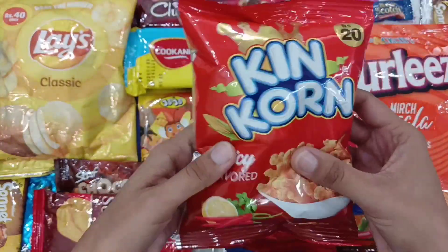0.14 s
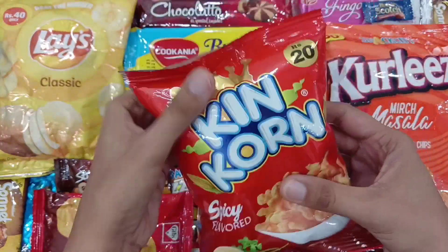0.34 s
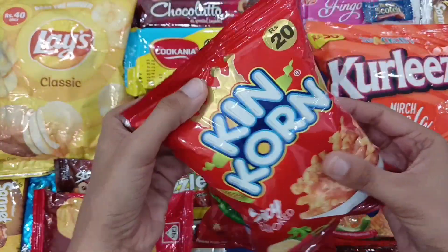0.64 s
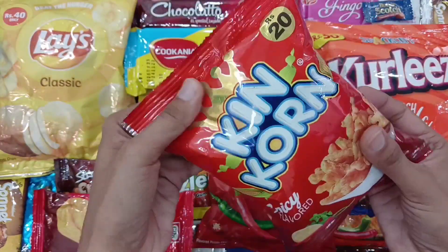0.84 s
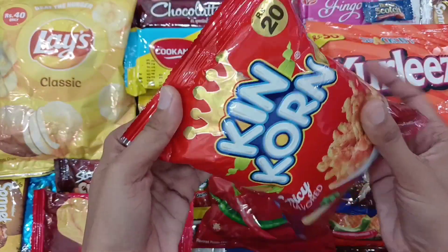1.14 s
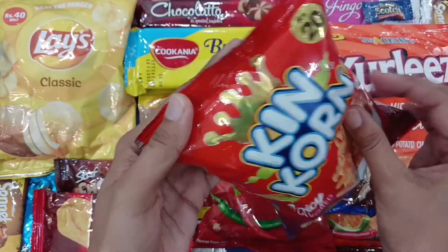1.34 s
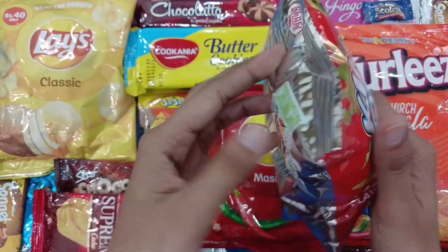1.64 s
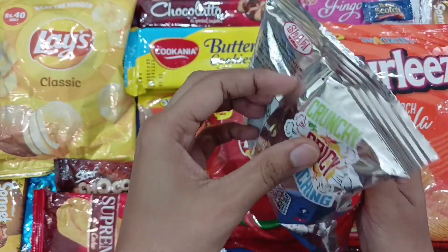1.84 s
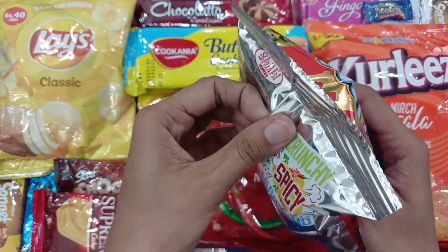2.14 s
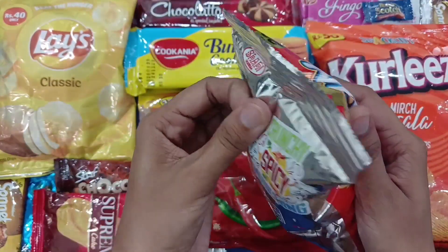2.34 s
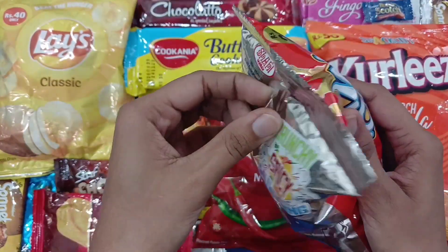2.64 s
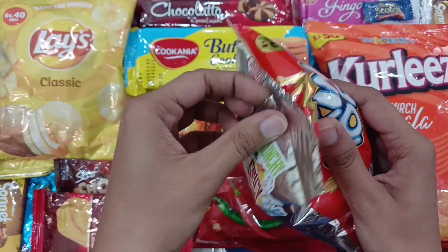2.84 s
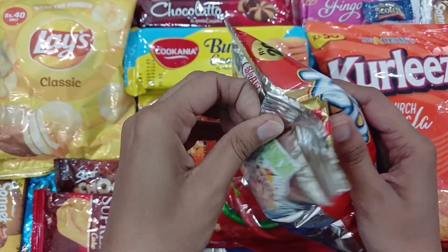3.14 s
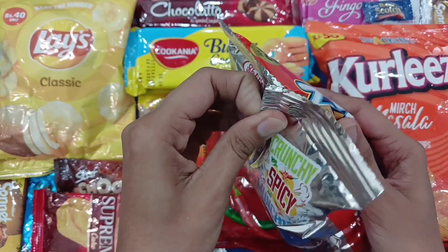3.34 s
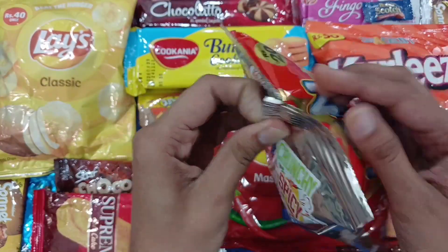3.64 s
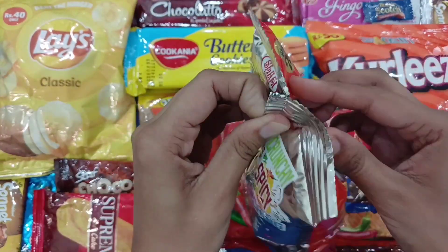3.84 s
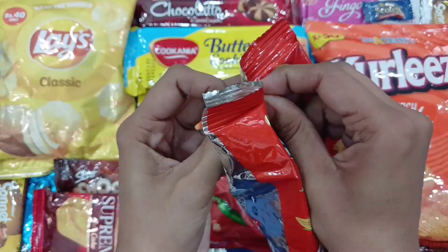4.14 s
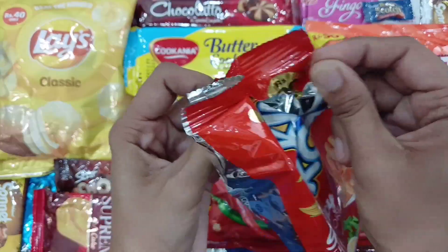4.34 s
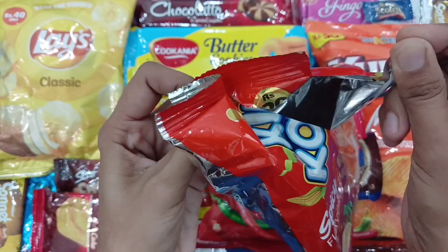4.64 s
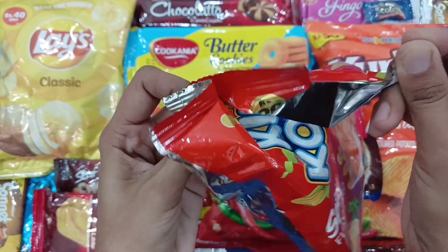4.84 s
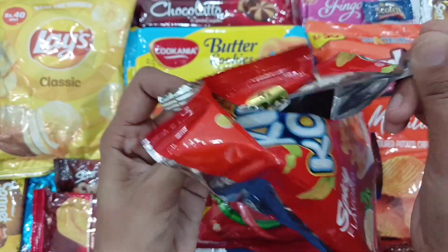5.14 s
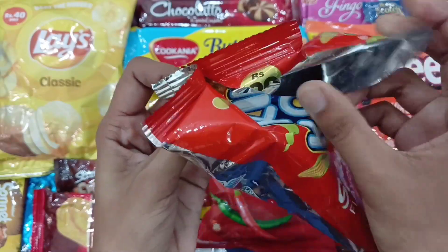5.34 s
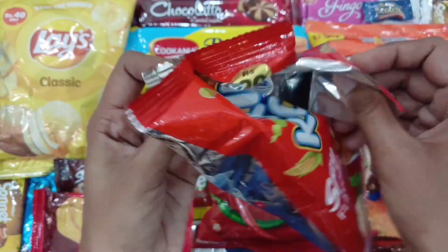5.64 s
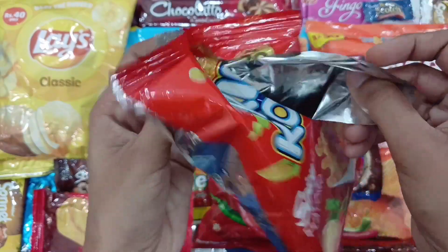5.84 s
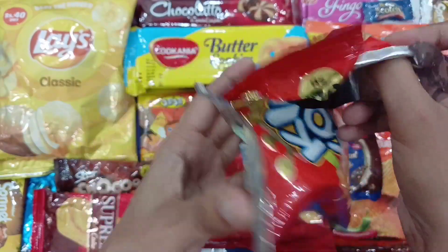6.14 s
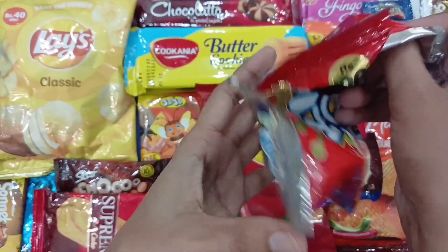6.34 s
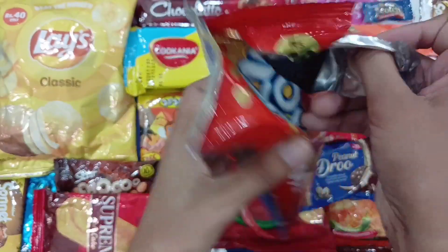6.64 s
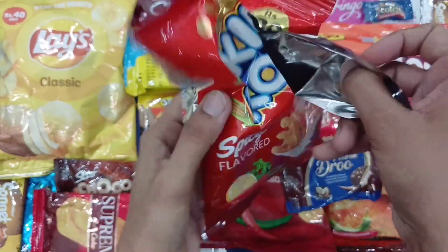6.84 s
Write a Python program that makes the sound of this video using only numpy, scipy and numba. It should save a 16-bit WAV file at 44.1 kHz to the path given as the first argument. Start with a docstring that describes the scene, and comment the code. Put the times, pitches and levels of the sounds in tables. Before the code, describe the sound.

Close, bright crinkling of a stiff plastic bag, with sharp snaps and dull airy thumps, a short pause, a tear, then looser, fainter rustling.

```python
"""A foil-lined snack packet, turned, squeezed and torn by hands close in front of a two-port phone.
Every crease that buckles rings for a few cycles; big snaps come as short avalanches of such rings
over a dense rustle of small ones, with lesser snaps between. The air-filled bag thumps below them.
The place is a quiet room: short echoes follow the packet and a faint room tone lies under it."""
import sys
import numpy as np
from scipy import signal
from scipy.fft import rfft, irfft, next_fast_len
from scipy.io import wavfile
from scipy.ndimage import uniform_filter1d
from numba import njit

SR = 44100
rng = np.random.default_rng(int(sys.argv[2]) if len(sys.argv) > 2 else 0)


def generate_wav(sig):
    """Save sig (samples, or channels by samples) to the path in sys.argv[1] as 16-bit PCM at SR."""
    pcm = np.round(np.clip(np.atleast_2d(sig).T, -1, 1) * 32767).astype(np.int16)
    wavfile.write(sys.argv[1], SR, pcm)


N = 307818  # length in samples

# Squeezes, turns and pulls of the hands. Each row: start of full strength in seconds, rise in seconds,
# hold in seconds, fall in seconds, rustle of the folds in dB rms before the microphone colour,
# foil against folds in dB, bag walls against folds in dB.
SQUEEZES = [(.0,0.06,.0,0.11,-38.5,-8,-5),(0.084,0.054,0.12,0.15,-38.5,-9,-6.5),(0.323,0.069,0.096,0.079,-50,-11,-14),(0.456,0.1,0.029,0.21,-34.5,-7.5,-6),
            (0.687,0.24,0.0056,0.14,-39,-3,-5.5),(0.796,0.031,0.13,0.073,-38.5,-14,-8),(0.894,0.12,0.062,0.12,-37.5,-3,-6),(1.093,0.06,.0,0.05,-47,-11,-32),
            (1.203,0.044,0.083,0.22,-40,-15,-11),(1.392,0.52,.0,0.075,-37.5,-1.5,-13.5),(1.439,0.0078,0.00047,0.018,-29.5,-9,-15),(1.488,0.21,0.1,0.16,-36.5,-8,-5),(1.742,0.089,0.03,0.2,-36.5,-8,-9),
            (1.861,0.087,.0,0.15,-37,-4,-4.5),(2.019,0.092,0.012,0.069,-37,-6.5,-20),(2.124,0.031,0.23,0.14,-37.5,-6.5,-11.5),(2.197,0.0096,0.014,0.017,-34.5,-6,-16),(2.464,.06,0.11,0.11,-47,-21,-7),(2.559,0.11,0.0076,0.21,-35.5,-5,-10),
            (2.69,.1,0.036,0.15,-57,-1,3),(2.795,0.046,0.014,0.12,-37,-8,-13),(2.9,0.13,0.0015,0.66,-42,-4.5,-23),(3.16,0.28,0,0.18,-42,-9,-12.5),
            (3.268,0.11,0.15,0.35,-37.5,-4,-11),(3.53,.1,0.076,0.18,-41.5,-7.5,-16.5),(3.687,0.047,0.0031,0.16,-34,-12,0),(3.792,0.048,.0,0.062,-27.5,-3.5,-16),
            (3.879,0.087,0.19,0.2,-40.5,-8,-7),(4.08,0.36,0.062,0.093,-44.5,-8.5,-13),(4.24,0.021,0.13,0.26,-43,1.5,-6),(4.44,0.11,0.037,0.16,-68,-17,10),
            (4.575,0.072,0.0071,0.11,-29.5,-4.5,-7),(4.693,0.11,0.015,0.19,-68,-9,-11),(4.793,0.09,0.17,.05,-59.5,-16,1.5),(4.954,0.015,0.1,0.054,-45.5,0,0),(5.11,0.044,0.078,.1,-54.5,-1,1.5),(5.216,0.083,0.056,0.07,-44,-6,-5),
            (5.399,0.034,0.016,0.069,-47,-12.5,-5.5),(5.531,0.028,0.06,0.16,-40,-3,-5),(5.664,0.079,0,.1,-48,-4.5,-11),(5.735,0.097,0.016,0.3,-41,-6.5,-5.5),
            (5.857,0.054,0.14,0.17,-43,-1.5,-6),(6.044,.05,0.068,0.12,-57,-8,1.5),(6.193,0.012,0.12,0.096,-48.5,-8,-6),(6.358,.1,0.029,0.13,-58.5,-3,-12),(6.577,0.11,0.035,.05,-75.5,-14,7),(6.659,0.0092,0.021,.1,-50.5,-16,-7),(6.693,0.015,0.13,0.26,-40,-9,-10),
            (6.96,0.12,0.034,.1,-31.5,-11,-9)]
SWING_DB = 20  # a rise or fall spans this much, times the pace below
# How fast each size of crease swells and dies against the folds. Each entry: a factor, whole bag to foil.
SWING_PACE = [.9, .95, 1.01, 1.05, 1.15]
WRINKLE_SHARE, WRINKLE_DB = 0.69, -0.5  # wrinkles lie between folds and foil: share of foil dB, offset dB
# Bass of the whole bag against its walls: low while gripped tight, most once torn.
# Each row: time in seconds, level in dB.
BOOM = [(0.0, -7), (0.9, -17.5), (1.55, -8), (2.1, -19), (3.2, -24), (3.75, -14), (4.3, -19), (4.55, 0),
        (4.85, 1.5), (5.3, -2.5), (6.1, -4.5), (6.6, 6), (6.98, -5.5)]

# Sizes of crease: whole bag, bag walls, folds, wrinkles, foil. Each row: lowest pitch in Hz,
# highest pitch in Hz, typical ring in cycles, rustle grains per second, size scatter in dB.
CREASE_SIZES = [(95, 230, 2.5, 400, 1.5), (200, 620, 2.0, 900, 2.5), (680, 2600, 1.9, 2400, 3.0),
                (2500, 6800, 2.6, 4200, 3.2), (6300, 16500, 3.2, 10000, 2.6)]
# The rustle dwells on this share of a size's pitch range, moves on this often per s, strays in octaves.
FOCUS_SHARE, FOCUS_RATE, STRAY_OCT = .8, 18, .15
# How strongly the quickest flurries shake the rustle. Each entry: strength in dB, whole bag to foil.
FLUTTER_DB = [2.3, 2.3, 2.8, 1.8, 1.24]

# Where the packet is held before the ports. Each row: time in seconds, left minus right in dB.
PAN = [(0.0, -1), (1.44, -0.5), (1.48, -4), (1.75, 0), (1.94, -5), (1.96, -1.0), (3.28, -0.5), (3.5, -3.5),
       (3.83, -1.5), (6.78, -1), (6.86, 1.0), (6.98, -4)]
# Port differences: mean lag and its scatter in s, balance scatter in dB.
PORT_LAG_S, PORT_SCATTER_S, PAN_SCATTER_DB = 5e-5, 6e-5, 3.5
# Further lag scatter in cycles of the ring; scatter of the ring length (natural log).
PORT_SCATTER_CYCLES, RING_SCATTER = 0.07, 0.37

# Faint room tone. Each row: frequency in Hz, relative density in dB per Hz.
AIR = [(18, -45), (30, -15), (189, 1), (384, -15), (540, -6), (1160, -19), (1910, -19), (2410, -23),
       (16000, -33)]
AIR_DB = -73  # rms over both ports, before the dips and the top cut

# Big snaps. Each row: time in seconds, then level in dB before trims and pitch in Hz
# for each part in turn: folds, bag walls, wrinkles, foil.
SNAPS = [(0.0643, -38, 2100.0, -47.5, 520.0, -30, 2990, -33, 10500.0),
         (0.0753, -35, 1880.0, -56.5, 430.0, -29, 3940, -25, 9780.0),
         (0.1012, -26.5, 706, -27.5, 510.0, -26, 3220, -27, 12000.0),
         (0.1199, -29, 1060.0, -25, 423, -35, 3310.0, -50, 10300.0),
         (0.1338, -22, 1630, -40, 390.0, -20.5, 3560, -20.5, 13000.0),
         (0.1693, -34, 965, -37, 400.0, -40, 4100.0, -38.0, 12400.0),
         (0.2082, -19.5, 1310, -29, 450.0, -24, 2960, -27, 11300.0),
         (0.216, -24, 990, -32, 377, -31, 4020.0, -33, 9910.0),
         (0.2725, -34.5, 949.0, -37, 530, -43, 3570.0, -50.0, 10100.0),
         (0.3135, -41, 1320.0, -45, 530.0, -35, 5190.0, -35, 11400.0),
         (0.3535, -32.5, 1720.0, -35, 510.0, -42, 4080, -41, 7820.0),
         (0.3942, -36, 1770.0, -38, 510.0, -35.0, 3220.0, -38, 8790.0),
         (0.4158, -26, 1330, -37, 425, -35, 3900.0, -45, 7330.0),
         (0.4241, -31, 1490.0, -37.5, 450.0, -34, 2700.0, -45, 8270.0),
         (0.4355, -23, 1060.0, -38, 270.0, -20, 5800, -20.5, 7600.0),
         (0.4563, -19.5, 1230, -21, 380, -26.0, 3840.0, -28, 14300.0),
         (0.4796, -22.5, 935, -43, 330.0, -27, 2840.0, -36, 10600.0),
         (0.4928, -45, 1140, -32, 290.0, -22, 6090.0, -14.5, 10400),
         (0.5239, -25.5, 880, -25.5, 392, -32, 4390.0, -46.0, 10100.0),
         (0.5519, -18, 840, -30, 398, -22, 3450, -21.5, 8960.0),
         (0.592, -38, 1360.0, -55.0, 370.0, -26, 5200, -28, 7240.0),
         (0.6405, -32, 1660.0, -59, 510.0, -31, 4830.0, -24, 11100.0),
         (0.6626, -22, 1250, -43, 352, -27, 3750.0, -28, 7460.0),
         (0.6723, -18.5, 1100, -27, 368, -14.5, 4970, -15.5, 9700),
         (0.7932, -22.5, 1100, -34, 308, -27, 3450.0, -28.5, 9950),
         (0.8052, -27, 1000, -41, 420.0, -34.5, 3250.0, -51, 8160.0),
         (0.8142, -39, 1285, -40.5, 240.0, -39, 4980.0, -15, 12600.0),
         (0.8281, -25, 1366, -33, 420.0, -21, 4800, -30.0, 10300.0),
         (0.8383, -24, 1410.0, -37, 440.0, -28, 3620, -29, 9540.0),
         (0.8482, -25, 890, -35, 440.0, -20, 4900.0, -15.5, 10500.0),
         (0.8719, -26.5, 1640.0, -33, 450.0, -15, 3640, -11.5, 10300),
         (0.882, -18.5, 980, -34, 450.0, -27, 3560, -32.5, 9440.0),
         (0.8887, -13.5, 1050, -26, 510.0, -18, 3700, -11, 10200),
         (0.9143, -17.5, 790, -20, 352, -22, 4010.0, -30, 11100.0),
         (0.9428, -40, 1240.0, -27, 345, -42, 4370.0, -37.5, 9870.0),
         (0.9587, -24.5, 923, -25.5, 442, -20, 3470, -19.5, 11600.0),
         (0.9676, -28, 1600.0, -41, 480.0, -24, 3680, -17.5, 11200.0),
         (1.0037, -29.5, 1510.0, -47, 320.0, -33, 2860, -28.5, 11000.0),
         (1.0849, -32.5, 888.0, -53, 500.0, -53, 3190.0, -47.5, 10700.0),
         (1.0944, -32.5, 1590.0, -50, 460.0, -31.5, 3860.0, -37.0, 10100.0),
         (1.1114, -32, 1460.0, -49.5, 480.0, -45, 3500.0, -47, 7890.0),
         (1.1483, -43, 1230.0, -42, 460.0, -36, 3610.0, -34.0, 12200.0),
         (1.1622, -37, 1650.0, -60, 470.0, -34, 4900, -39, 7110.0),
         (1.2023, -24.5, 1610, -34.5, 477, -27.5, 3500.0, -24.5, 11700.0),
         (1.2152, -31, 2010.0, -38, 510.0, -24.5, 3470, -36, 10200.0),
         (1.2235, -19, 1790, -24, 490.0, -44, 3040.0, -27, 12300.0),
         (1.2693, -20.5, 1250.0, -33, 330.0, -26, 4550.0, -31.0, 8520.0),
         (1.2856, -24, 963, -35, 350.0, -25, 4870.0, -22.5, 9380.0),
         (1.2926, -26.5, 802.0, -38, 500.0, -29, 5050.0, -22, 12000.0),
         (1.3425, -25.5, 1210.0, -29, 510.0, -24, 4250, -30, 9840.0),
         (1.3575, -25, 1050.0, -32, 380.0, -23, 3260.0, -32.5, 10100.0),
         (1.3834, -26, 1320, -34, 520.0, -29, 4110.0, -26, 7290.0),
         (1.3997, -28, 1450, -28, 470.0, -33, 3700.0, -35, 10200.0),
         (1.4345, -11.5, 1030, -29.5, 310.0, -14.5, 3540, -13, 9340.0),
         (1.4591, -35, 1430.0, -41, 480.0, -23.5, 3920.0, -21.5, 9560.0),
         (1.5118, -33, 1150, -32, 496, -40, 3860.0, -38.0, 10100.0),
         (1.5213, -26, 1090.0, -28.5, 432, -17, 4550, -12, 13300.0),
         (1.5383, -28, 1800.0, -26, 376, -19, 4410.0, -22, 11100.0),
         (1.5694, -20.5, 1480, -25.5, 328, -21, 5300, -22, 11000.0),
         (1.5847, -23.0, 740, -25.5, 327, -21, 4220, -18.5, 10900.0),
         (1.6448, -22.5, 1250, -49, 370.0, -28, 4170, -30, 10000.0),
         (1.6954, -38, 677.0, -22.5, 510, -42, 4190.0, -53.5, 8500.0),
         (1.7088, -29, 1010.0, -38, 510.0, -33, 3470.0, -42, 8190.0),
         (1.7225, -19, 1370.0, -31, 410.0, -21, 3670.0, -22, 11200.0),
         (1.7357, -21.5, 905, -27, 400, -20, 4500, -13.5, 11400),
         (1.7761, -36, 1620.0, -41, 360.0, -18.5, 4790.0, -17, 12800.0),
         (1.798, -26, 1300, -31, 400.0, -19.5, 4830.0, -21, 11200.0),
         (1.8558, -30, 1240.0, -44, 350.0, -24.5, 4110.0, -23, 8730.0),
         (1.8701, -20.5, 965, -23.5, 476, -21.5, 3860.0, -36, 11300.0),
         (1.9135, -29.0, 743.0, -31.5, 500.0, -37.5, 3810.0, -37, 9520),
         (1.9280, -25, 1300, -37, 460.0, -17.5, 2700, -17.5, 10800.0),
         (1.9605, -37, 840, -35, 490.0, -33.0, 2890, -46.0, 10400.0),
         (1.9886, -33, 1500.0, -51, 460.0, -29, 3770.0, -23, 11400.0),
         (2.0065, -20.5, 1480.0, -29.5, 520, -24, 3600, -24, 12400.0),
         (2.0139, -30, 1182, -31, 460.0, -29.5, 3590.0, -38.5, 11200.0),
         (2.0275, -25, 1240, -25, 470.0, -24, 3740.0, -25.5, 8000.0),
         (2.0372, -25, 1000, -29, 467, -26.5, 2860, -35.5, 9850.0),
         (2.1178, -24.5, 1410.0, -26.5, 480, -24, 3580.0, -23, 12100.0),
         (2.1261, -25.5, 1770.0, -40.5, 440.0, -31, 3080.0, -33, 9180.0),
         (2.139, -24, 1200, -28, 490, -29, 4310.0, -27.5, 10700.0),
         (2.1800, -24.5, 2000, -38, 450.0, -31, 2760.0, -19.5, 13340),
         (2.2008, -33, 1800.0, -32, 510.0, -27, 4140, -26, 11200.0),
         (2.2115, -43, 1530.0, -42.5, 450.0, -22, 4030.0, -21, 11700.0),
         (2.2318, -12, 1050, -27, 319, -14, 3100, -16, 9100),
         (2.249, -23, 1110, -26.5, 443, -10.5, 2230, -18, 12300.0),
         (2.2568, -19, 1000, -18, 474, -32, 2720.0, -47.0, 13500.0),
         (2.2712, -32, 1090.0, -34.5, 460.0, -24, 4370, -11.5, 12850),
         (2.278, -21.5, 1240, -38, 430.0, -28, 5120.0, -18, 13300.0),
         (2.309, -42.5, 1080.0, -28.5, 382, -22.5, 3370.0, -30, 11400.0),
         (2.3315, -29.5, 780, -20.5, 513, -30, 3360.0, -38, 11900.0),
         (2.3383, -25, 870, -24, 515, -40.0, 3080.0, -48.0, 9930.0),
         (2.3473, -18.5, 740, -19, 526, -24.0, 5050, -32, 10200.0),
         (2.3641, -48.5, 1680.0, -40, 460.0, -35, 3510.0, -28.5, 11900.0),
         (2.3758, -27, 990, -37.5, 480.0, -37, 4040, -36, 11100.0),
         (2.4433, -35, 1410.0, -39, 520.0, -28, 2870, -33, 7840.0),
         (2.4644, -38, 1290.0, -44, 490.0, -40, 3160.0, -31, 11300.0),
         (2.4875, -30, 890, -44, 480, -34, 2500, -45, 9000),
         (2.5094, -23.5, 950.0, -44, 500.0, -23, 3060, -20, 12000.0),
         (2.525, -22, 1500, -29, 360.0, -29, 3400.0, -34.5, 12300.0),
         (2.548, -21.5, 856, -37, 490, -24, 4250, -20.5, 12500.0),
         (2.5545, -20.5, 860, -34, 476, -20, 3900, -28, 10000),
         (2.5775, -26, 1200, -42, 480.0, -14.5, 4130, -19, 13000.0),
         (2.5932, -28, 1230.0, -24, 510.0, -25, 4350.0, -22, 9550.0),
         (2.6076, -24, 1260.0, -30, 470.0, -24.0, 2980.0, -26, 8130.0),
         (2.622, -25, 1170, -40, 390.0, -21, 4640.0, -18, 11400.0),
         (2.6842, -44, 1100, -43, 430, -34, 2400, -40, 9000),
         (2.6988, -36, 1930.0, -45, 430.0, -29.5, 3560.0, -33.5, 9590.0),
         (2.715, -30, 820, -34.5, 456, -36, 2850.0, -44.5, 9470.0),
         (2.7227, -23.5, 770, -36, 510.0, -30, 3400.0, -44.0, 9700.0),
         (2.7432, -43, 936.0, -44, 400.0, -40.0, 3730.0, -39, 9120.0),
         (2.7972, -27, 1520.0, -34, 480.0, -32, 4700.0, -23, 13200),
         (2.8095, -26, 2170.0, -41, 300.0, -26, 3180.0, -27, 11800.0),
         (2.8716, -20.5, 1470, -37, 530.0, -21.5, 3830, -30, 7150),
         (2.8961, -20, 1400, -50, 540.0, -28, 4100.0, -17, 11700),
         (2.9065, -18, 1070, -34.5, 524, -18.5, 4540, -17.5, 10800.0),
         (2.9438, -28, 1160.0, -48, 430.0, -25, 4860.0, -18, 12000),
         (2.9872, -23, 1170, -43, 500.0, -36, 3310.0, -21.5, 10500.0),
         (2.9971, -20.5, 1380, -36, 490.0, -27, 2810, -21, 11200),
         (3.0363, -26.5, 815, -33.5, 480.0, -29, 3540, -27, 7170.0),
         (3.0802, -34, 2010, -60.0, 510.0, -34, 4750.0, -25, 11900),
         (3.1049, -30, 876, -41, 440.0, -27, 4020, -24.5, 8950.0),
         (3.15, -25, 1340.0, -46, 450.0, -42.5, 3750.0, -43.5, 9510.0),
         (3.1701, -29, 1120.0, -42, 380.0, -35.5, 3440.0, -48, 10000.0),
         (3.1876, -29, 1390, -42.5, 410.0, -28, 3820.0, -30, 8920.0),
         (3.1978, -26, 754, -34.5, 520, -22, 4370.0, -23, 12100.0),
         (3.2112, -26, 1070, -41.5, 350.0, -29, 3920, -37.5, 8320.0),
         (3.2305, -20.5, 1800, -41, 420.0, -17, 4070, -14, 11600),
         (3.2425, -21, 1450, -17, 480, -20, 4500, -18.5, 11300),
         (3.2663, -33, 1510.0, -31.5, 447, -27, 4690.0, -32, 10700.0),
         (3.2907, -21, 1830.0, -37, 530.0, -24, 4570.0, -29, 10800.0),
         (3.2978, -20, 890, -34.5, 540.0, -20.5, 4090.0, -19, 10700.0),
         (3.3079, -20, 1730.0, -36, 350.0, -17, 5640, -19, 10900.0),
         (3.3447, -21.5, 940, -37, 533, -18, 3400, -14.5, 13550),
         (3.4024, -29, 1570, -34.5, 370.0, -32, 4820, -23, 7250.0),
         (3.4405, -27.5, 1070, -33, 480.0, -33, 5380.0, -25.0, 9510.0),
         (3.4507, -25.5, 873, -27.5, 450.0, -29.5, 4150, -34, 8830.0),
         (3.4631, -31, 1600.0, -29, 388, -29, 3740, -30.5, 8640.0),
         (3.4866, -25.5, 1590.0, -31, 420.0, -42, 3370, -41, 11900.0),
         (3.5196, -16.5, 1066, -39, 350.0, -12.5, 2290, -22, 8700),
         (3.5388, -17.5, 950, -35.5, 330.0, -20.5, 3260, -37, 9310.0),
         (3.5477, -37, 1820.0, -35.5, 360.0, -24.5, 3700.0, -25.5, 8750.0),
         (3.5734, -20.5, 1145, -33, 403, -21.5, 2350.0, -23, 12900.0),
         (3.6071, -18.5, 1010, -36.5, 540.0, -26, 3340.0, -27.5, 8460.0),
         (3.6663, -25, 820, -26, 410.0, -30, 4970, -30, 7100.0),
         (3.6876, -50.0, 978.0, -37, 460.0, -41.5, 3710.0, -33, 10600.0),
         (3.7021, -16.5, 685, -23, 470, -21, 4760.0, -21.5, 8400.0),
         (3.7104, -19, 749.0, -24, 367, -24, 3230, -32, 11000.0),
         (3.7435, -14.5, 890, -22, 505, -19.5, 5030, -17.5, 13400.0),
         (3.7668, -31, 847, -24, 366, -34, 4730.0, -34.5, 12700.0),
         (3.7937, -13.5, 1020, -20, 383, -12.5, 2550, -13, 12800.0),
         (3.8281, -32.5, 1820, -36, 330.0, -32, 4200.0, -33, 10600.0),
         (3.8915, -28, 1956, -43, 333, -28.5, 3090.0, -23.5, 9290.0),
         (3.9246, -22, 925, -38.5, 480.0, -25.5, 2960, -27.5, 8850.0),
         (3.9397, -26.5, 915.0, -42, 330, -43, 2840, -52, 10600.0),
         (3.9892, -27, 1000.0, -55, 390.0, -25, 3510.0, -41, 8020.0),
         (4.0031, -27, 2200.0, -42, 440.0, -17, 4350.0, -19, 8500),
         (4.04, -26, 1190, -42, 470.0, -23.5, 2900, -18, 13800),
         (4.0501, -12.5, 1030, -26.5, 290.0, -15, 2430, -14.5, 7600),
         (4.0731, -18.5, 1840, -30, 305, -32.5, 2580.0, -40, 11000.0),
         (4.1680, -49, 1200, -51, 450, -56, 2800, -70, 7500),
         (4.1879, -45.0, 1700.0, -61.5, 430.0, -49, 4740.0, -38, 7740.0),
         (4.2062, -36.5, 1430.0, -56.0, 450.0, -34, 3810.0, -41.5, 10500.0),
         (4.2294, -41, 1840, -52.0, 470.0, -39, 5130.0, -22, 10100.0),
         (4.2441, -21, 1500, -21, 525, -20, 4000, -22, 11200.0),
         (4.253, -25.0, 1530.0, -28, 420.0, -19, 4840.0, -21, 10300.0),
         (4.2656, -28, 1220, -31, 493, -23, 4000, -33, 8130.0),
         (4.2924, -44.5, 1700.0, -33, 430.0, -27, 4490.0, -35, 12800.0),
         (4.3118, -23, 2100.0, -47, 400.0, -26, 3600.0, -27, 12200.0),
         (4.3186, -23, 1480, -49, 420.0, -16, 3400, -9, 14400.0),
         (4.3317, -19, 1980.0, -32, 370.0, -22.5, 3550, -26, 12000.0),
         (4.3493, -25, 2040.0, -47, 410.0, -23, 4190.0, -20, 12100.0),
         (4.3865, -36, 1290.0, -45, 370.0, -35, 3600.0, -35, 12100.0),
         (4.4505, -25, 1020, -35, 370.0, -32, 2680, -51, 9340.0),
         (4.5202, -30, 1930.0, -31, 320.0, -33, 3600.0, -49, 9000.0),
         (4.555, -21, 1910.0, -23.5, 240.0, -35, 3300.0, -34, 8070.0),
         (4.5662, -16.5, 1610, -34, 347, -35, 4320.0, -34.0, 9320.0),
         (4.5741, -21, 1480, -21.5, 283, -26, 3810.0, -35.5, 8270.0),
         (4.5922, -39, 961.0, -48, 370.0, -30, 4190.0, -25, 13700.0),
         (4.6015, -15, 1500, -23, 304, -18, 3710.0, -19, 11300.0),
         (4.6534, -41, 1510.0, -51, 302, -29, 4210.0, -21, 13400.0),
         (4.8039, -40.5, 1325, -43, 232, -43, 2880, -53.0, 8220.0),
         (4.8135, -48, 1700, -52, 230, -41, 2900, -60, 8000),
         (4.8696, -46, 1206, -50, 230.0, -54.0, 4420, -66.0, 8070.0),
         (4.8841, -39.5, 1720.0, -46, 281, -44.0, 2840, -50, 7710.0),
         (4.9388, -30, 1360, -31, 380.0, -32, 5250, -26, 9670.0),
         (4.956, -26, 1020, -36, 410.0, -18, 3540, -23, 10300.0),
         (4.9702, -32.5, 1550, -43, 340.0, -34, 3900.0, -41, 12800.0),
         (4.9833, -23.5, 1170, -32, 357, -21.5, 4200, -14, 12900.0),
         (5.0485, -31.5, 990, -27.5, 270, -39, 4740.0, -41, 11200.0),
         (5.1087, -38.5, 1010.0, -51, 330.0, -39.0, 3330.0, -42.5, 12100.0),
         (5.1376, -28, 1390, -42, 320.0, -19, 5030.0, -21.5, 11400),
         (5.1965, -30.5, 1030, -35, 290.0, -33, 2890.0, -46.0, 8850.0),
         (5.2162, -35, 1090.0, -37, 360.0, -37, 3880.0, -41.5, 7390.0),
         (5.2342, -34, 1600, -42.5, 500, -40, 2800, -45, 8000),
         (5.2512, -33, 1350.0, -45, 280.0, -38, 4750.0, -35, 11600.0),
         (5.2708, -32.5, 1040, -34, 300.0, -24.5, 4120, -26.5, 8900),
         (5.4079, -37.5, 1500, -46, 400, -48, 2700, -59, 7500),
         (5.4229, -34.5, 1730, -44, 230.0, -33, 2720.0, -51.5, 7460.0),
         (5.523, -34, 1380.0, -30, 417, -34, 3240.0, -40.5, 12100.0),
         (5.5546, -29, 1720, -35.5, 378, -28.5, 4430.0, -33, 10600.0),
         (5.5778, -20, 1900, -35, 370.0, -16.5, 3930, -10, 12800),
         (5.6094, -35.5, 864.0, -38, 450.0, -25, 3660.0, -28, 11000.0),
         (5.686, -47.5, 1570, -51, 360.0, -32, 4110.0, -42, 10200.0),
         (5.7028, -41, 1950.0, -44, 300.0, -28.5, 3610, -46, 9900),
         (5.7292, -39, 1500, -45, 400, -29, 3780, -39.5, 8000),
         (5.7384, -28, 1204, -49, 360.0, -10, 3430, -16, 8740),
         (5.7517, -26.5, 1100.0, -29.5, 382, -15, 4770, -22, 11500.0),
         (5.7902, -28, 816.0, -40, 308, -41, 3790.0, -40, 12500.0),
         (5.8054, -29, 1080, -26, 350, -29, 4780.0, -40.0, 8210.0),
         (5.8649, -22.5, 1510, -25, 700.0, -21, 3300, -17.5, 9400),
         (5.8943, -51.0, 1510.0, -51, 350.0, -42, 4740.0, -34, 10600.0),
         (5.9142, -30, 1590.0, -34.5, 292, -36, 4160.0, -41, 8800.0),
         (5.9228, -38, 1600, -45, 330, -31, 4500, -33, 8000),
         (5.9284, -41, 1660.0, -35, 330.0, -27, 3660.0, -33, 12500.0),
         (5.9539, -36, 1130.0, -42, 250.0, -16.5, 3620, -13.5, 11600),
         (5.9981, -41, 1500, -52, 400, -32, 2760, -42, 8000),
         (6.0108, -40, 1500, -50, 400, -29, 3700, -42, 8000),
         (6.0258, -36, 1160, -48, 360.0, -25, 3400, -24.5, 12300.0),
         (6.0744, -30, 1460, -39, 450.0, -33, 4430.0, -49.0, 10200.0),
         (6.1001, -44, 1060.0, -44, 510.0, -32.5, 2980, -49, 11100.0),
         (6.1912, -36.5, 1300.0, -51, 420.0, -42, 4760.0, -34.5, 7900),
         (6.2049, -35, 992, -46, 420, -44, 2800, -48, 8000),
         (6.2513, -35.5, 960.0, -42, 348, -31, 3920.0, -29, 10100.0),
         (6.2790, -28.5, 930, -47, 380.0, -19.5, 4470, -24, 13200.0),
         (6.3044, -33, 1080, -43, 440.0, -37, 4700, -31, 8300.0),
         (6.3707, -43, 1170.0, -45, 474, -35, 4690.0, -44, 9290.0),
         (6.3871, -40, 1980, -47, 473, -51, 3110.0, -59.0, 9660.0),
         (6.3956, -42, 1510, -60, 472, -37, 4300.0, -55.0, 9910.0),
         (6.6768, -36, 2100.0, -51, 250.0, -44, 2480.0, -52.0, 9630.0),
         (6.6945, -27.5, 1140.0, -38, 310.0, -32.5, 3230, -35.5, 7800),
         (6.7174, -35.5, 1710.0, -40.5, 388, -37, 3850.0, -33, 9950.0),
         (6.7409, -28, 1350.0, -53, 348, -37, 3060.0, -34, 7900.0),
         (6.7696, -38, 1750, -38, 342, -35, 3650.0, -42.5, 11400.0),
         (6.787, -26.0, 1720, -32, 506, -29, 4290.0, -23, 11800.0),
         (6.8544, -23.5, 1040, -49, 340.0, -31, 3425, -42.0, 8680.0),
         (6.9062, -37, 1210.0, -44, 310.0, -28, 3560.0, -28, 9800.0),
         (6.9356, -29, 1000, -34, 400, -31, 3300, -40.5, 8000),
         (6.9570, -19, 1110, -26, 380.0, -19, 3500, -24.5, 8180.0)]
NEIGHBOUR_DB = 4  # rings around a buckle start this far under it
BUCKLE_SCATTER, BUCKLE_RING = 0.41, 1.374  # the buckle's scatter and ring, as factors of its neighbours'
OVERTONE_RATIO, OVERTONE_DB = 2.03, -7.5  # a fold also rings in its second mode

# Lesser snaps at random: per s, level over the rustle in dB before the snap trims,
# scatter in dB, scatter between the parts in dB.
TICK_RATE, TICK_DB, TICK_SCATTER_DB, TICK_COLOUR_DB = 12, 6.5, 3.5, 3.5
# Pitch ranges of the lesser snaps: walls, folds, wrinkles, foil. Each row: one end in Hz, other end in Hz.
TICK_HZ = [(300, 620), (884, 1820), (2800, 5600), (8000, 7800)]

# Thumps of the air-filled bag when gripped or shifted. Each row: time in seconds, level in dB before
# trims, pitch in Hz, deep push against the ring in dB before trims.
THUMPS = [(0.114, -42, 209, -20), (0.167, -42.5, 165, -22), (0.201, -45, 167, -16), (0.437, -36, 169, -23),
          (0.525, -44, 173, -25), (0.799, -48, 210, -26), (0.889, -37, 190, -16), (0.927, -36.5, 170, -30),
          (1.436, -32.5, 207, -23), (1.542, -31.5, 168, -26), (1.574, -33.5, 198, -27),
          (1.611, -45, 178, -16), (1.737, -34.5, 203, -29), (2.236, -35.5, 206, -22), (2.31, -47, 189, -34),
          (2.336, -39, 176, -20), (3.245, -43, 190, -26), (3.575, -46, 194, -24), (3.678, -32.5, 171, -31),
          (3.769, -41, 185, -25), (3.796, -56, 184, -26), (4.053, -39, 212, -24), (4.544, -36.5, 186, -25),
          (4.574, -32.5, 136, -10), (4.605, -42.5, 177, -24.5), (4.755, -50.5, 200, -24),
          (4.785, -48, 170, -25), (4.812, -49, 215, -25), (4.853, -48, 190, -25), (4.873, -43, 158, -21),
          (5.001, -44, 132, -22), (5.057, -40, 172, -28), (5.205, -39.5, 170, -24), (5.277, -41, 172, -19),
          (5.565, -46.5, 151, -17), (5.598, -49, 185, -21), (5.741, -50, 157, -21),
          (5.808, -34.5, 177, -22), (5.868, -40, 160, -21), (5.917, -40, 136, -17), (5.965, -43, 154, -6),
          (6.007, -43, 144, -19), (6.804, -43.5, 152, -13), (6.96, -33, 122.7, -20)]

# Echoes of the table and near things, then of the walls. Each row: T60 in seconds,
# level in dB before the treble loss.
ROOM = [(0.062, -12), (.35, -10)]
ROOM_HZ = 8400  # the echoes lose treble above this
# The table's echo hollows out a band, less as the packet is lifted and opened.
HOLLOW_HZ, HOLLOW_WIDTH_HZ = 1332, 357
# Each row: time in seconds, mean share of the band removed (0-1) before it wavers.
HOLLOW = [(0.0, .45), (3.9, .45), (4.5, .05), (6.98, .15)]
# Everything but the big snaps dips briefly, or lifts where the depth is positive. Each row:
# start in seconds, ramp in seconds, end in seconds, ramp back in seconds, full depth in dB.
DIPS = [(2.155, 0.0099, 2.16, 0.0027, -15), (3.498, 0.014, 3.56, .003, -3),
        (4.135, 0.022, 4.215, 0.05, -23), (4.9, 0.013, 4.93, .003, 1)]
# Colour of microphone and table. Each row: frequency in Hz, gain in dB.
COLOUR = [(25, -14.5), (40, -12), (80, -10), (125, -3.5), (260, -3.5), (480, -0.93), (700, 1.5),
          (1000, -0.17), (1350, 0), (1900, 1.5), (2500, 1.5), (3300, 0.4), (5000, 4), (9000, 0.5),
          (14000, 5)]
TOP_HZ = 15900  # upper limit of the sound


def undb(db):
    """Amplitude ratio of a level in dB."""
    return 10 ** (np.asarray(db) / 20)


def shape(x, table):
    """Filter by (Hz, dB) points joined on a log-frequency axis."""
    hz, db = np.transpose(table)
    size = next_fast_len(N)
    bin_hz = np.arange(1, size // 2 + 2) * SR / size
    gain = undb(np.interp(np.log(bin_hz), np.log(hz), db))
    return irfft(rfft(x, size) * gain, size)[..., :N]


def at_all_times(table):
    """Join the (s, value) points of a table into one value per sample."""
    return np.interp(np.arange(N) / SR, *np.transpose(table))


def walk(rate):
    """Random levels held 1 / rate s and slewed; spread near 1."""
    k = int(SR / rate)
    held = np.repeat(rng.standard_normal(N // k + 1), k)
    return 1.5 * uniform_filter1d(held, k)[:N]


@njit
def rings(n, start, hz, cycles, gain):
    """Each crease rings as t exp(-t) sin(w t), peak near its gain; start in samples."""
    out = np.zeros(n)
    for k in range(len(start)):
        tau = cycles[k] * SR / hz[k] / 3
        pole = -1 / tau + 2j * np.pi * hz[k] / SR
        first = int(start[k]) + 1
        t = first - start[k]
        z = gain[k] * np.e / tau * np.exp(pole * t)
        step = np.exp(pole)
        for i in range(max(first, 0), min(first + int(9 * tau), n)):
            out[i] += t * z.imag
            z *= step
            t += 1
    return out


def creases(s, hz, cycles, db, pan_db, scatter=1.):
    """Buckles at scattered spots: each reaches the two ports with its own lag, balance, sign and ring."""
    lag, skew, tilt, sign, ring = rng.standard_normal((len(s), 5)).T * scatter
    # a crease is spread out, so the ports also hear it a part of a cycle apart
    lag_s = PORT_LAG_S * scatter + PORT_SCATTER_S * lag + PORT_SCATTER_CYCLES * skew / hz
    pan_db = pan_db + PAN_SCATTER_DB * tilt
    stretch = np.exp(RING_SCATTER * ring)
    gain = np.sign(sign) / np.sqrt(stretch)  # a longer ring spreads the same energy
    ports = []
    for side in (1, -1):  # left, right
        start = (s - side * lag_s / 2) * SR
        port_gain = gain * undb(db + side * pan_db / 2)
        ports.append(rings(N, start, hz, cycles * stretch, port_gain))
    return np.array(ports)


def handling():
    """Rustle level of each size of crease, whole bag to foil: the squeezes rise, hold, fall and add up."""
    t = np.arange(0, N / SR + .002, .002)
    s, rise, hold, fall, db, foil_db, wall_db = np.transpose(SQUEEZES)[:, :, None]
    before = np.maximum(s - t, 0) / np.maximum(rise, .01)
    after = np.maximum(t - s - hold, 0) / np.maximum(fall, .01)
    away = before + after
    boom_db = np.interp(s, *np.transpose(BOOM))
    wrinkle_db = WRINKLE_DB + WRINKLE_SHARE * foil_db
    levels_db = []
    for size_db, pace in zip([wall_db + boom_db, wall_db, 0, wrinkle_db, foil_db], SWING_PACE):
        squeeze_db = db + size_db - SWING_DB * pace * away
        power = np.sum(undb(2 * squeeze_db), axis=0)
        levels_db.append(np.interp(np.arange(N) / SR, t, 10 * np.log10(power + 1e-12)))
    return np.array(levels_db)


def rustle(crease_size, db, pan_db, flurry_db):
    """Many small creases, most faint and a few stronger, coming in flurries."""
    low_hz, high_hz, cycles, rate, scatter_db = crease_size
    place, pitch, size = rng.random((int(rate * N / SR), 3)).T
    at = (place * N).astype(int)
    held = int(SR / FOCUS_RATE)
    focus = rng.random(N // held + 1)[at // held]
    pitch = (focus + FOCUS_SHARE * pitch) % 1
    stray = 2 ** (STRAY_OCT * rng.standard_normal(len(at)))
    hz = np.minimum(low_hz * (high_hz / low_hz) ** pitch * stray, .4 * SR)
    grain_db = flurry_db[at] - scatter_db * np.log(1 - .98 * size)
    # short rings carry less energy, so they are struck harder
    power = np.sum(undb(2 * grain_db)) / N
    grain_db = grain_db - 10 * np.log10(power * cycles * SR / hz / 3)
    return creases(at / SR, hz, cycles, grain_db + db[at], pan_db[at])


def air():
    """Faint room tone: shaped noise, partly shared by both ports."""
    shared, left, right = shape(rng.standard_normal((3, N)), AIR)
    tone = shared + 0.66 * np.array([left, right])
    return undb(AIR_DB) * tone / np.std(tone)


def avalanche(s, hz, cycles, db, pan_db, spread_s, lead, detune, fade_db, count):
    """A buckle among weaker rings at nearby pitches, spread closely around it, mostly after."""
    wait, pitch = np.moveaxis(rng.random((len(s), count, 2)), 2, 0)
    other = (np.arange(count) > 0) + 0 * wait  # the first ring is the buckle itself
    wait = (wait - lead) * other
    tone = np.minimum(hz[:, None] * 2 ** (detune * (2 * pitch - 1) * other), .4 * SR)
    level = db[:, None] - fade_db * np.abs(wait) - NEIGHBOUR_DB * other
    ring = cycles * np.where(other, 1, BUCKLE_RING)
    start = s[:, None] + spread_s * wait - ring / tone / 3  # each ring peaks a little after its start
    scatter = np.where(other, 1, BUCKLE_SCATTER)
    return creases(start.ravel(), tone.ravel(), ring.ravel(), level.ravel(),
                   np.repeat(pan_db, count), scatter.ravel())


def snaps(rows):
    """Each snap: a fold cracks, the bag walls knock, wrinkles and foil sizzle, each around its own pitch."""
    s, fold_db, fold_hz, wall_db, wall_hz, wrinkle_db, wrinkle_hz, foil_db, foil_hz = np.transpose(rows)
    pan_db = np.interp(s, *np.transpose(PAN))
    fold = avalanche(s, fold_hz, 1.584, fold_db - 0.9, pan_db,
                     spread_s=0.005045, lead=.06, detune=0.51, fade_db=12.0, count=6)
    wall = avalanche(s, wall_hz, 1.54, wall_db - 4.0, pan_db,
                     spread_s=0.00744, lead=0.11, detune=0.26, fade_db=8.5, count=3)
    wrinkle = avalanche(s, wrinkle_hz, 1.69, wrinkle_db - 2.0, pan_db,
                        spread_s=0.0055, lead=0.1795, detune=0.66, fade_db=10.0, count=12)
    foil = avalanche(s, foil_hz, 1.94, foil_db - 1.5, pan_db,
                     spread_s=.007, lead=.22, detune=0.78, fade_db=14.0, count=24)
    overtone = avalanche(s, OVERTONE_RATIO * fold_hz, 2.58, fold_db + OVERTONE_DB, pan_db,
                         spread_s=.004, lead=0.061, detune=0.37, fade_db=8.0, count=2)
    return fold + overtone + wall + wrinkle + foil


def ticks(levels_db):
    """Rows like SNAPS at random times, their levels set from the rustle of that moment."""
    count = int(TICK_RATE * N / SR)
    place, *pitch = rng.random((count, 5)).T
    size, *colour = rng.standard_normal((count, 5)).T
    rustle_db = levels_db[1:, (place * N).astype(int)]
    db = rustle_db + TICK_DB + TICK_SCATTER_DB * size + TICK_COLOUR_DB * np.array(colour)
    hz = [low * (high / low) ** p for (low, high), p in zip(TICK_HZ, pitch)]
    # levels run from walls to foil, but a snap row names the folds first
    return np.transpose([place * N / SR, db[1], hz[1], db[0], hz[0], db[2], hz[2], db[3], hz[3]])


def thumps():
    """The air in the bag rings once or twice, over a deeper push."""
    s, db, hz, deep_db = np.transpose(THUMPS)
    pan_db = np.interp(s, *np.transpose(PAN))
    ring = creases(s - 2.28 / hz / 3, hz, 1.53, db + 5.0, pan_db)
    push = creases(s - .008, 48 + 0 * s, 1.3, db + deep_db + 7.5, pan_db, scatter=1.4)
    return ring + push


def room(dry):
    """A quick tail from the table and a longer one from the walls: fading noise, unlike left and right."""
    t = np.arange(SR // 2) / SR
    tail = 0
    for t60_s, db in ROOM:
        part = rng.standard_normal((2, len(t))) * undb(-60 * t / t60_s)
        tail = tail + undb(db) * part / np.sqrt(np.sum(part ** 2, axis=1, keepdims=True))
    tail = signal.sosfilt(signal.butter(1, ROOM_HZ, fs=SR, output="sos"), tail)
    return signal.fftconvolve(dry.mean(axis=0)[None], tail, axes=1)[:, :N]


def hollow(x):
    """The table's echo takes a wavering share of one band away."""
    band = signal.filtfilt(*signal.iirpeak(HOLLOW_HZ, HOLLOW_HZ / HOLLOW_WIDTH_HZ, fs=SR), x)
    share = at_all_times(HOLLOW) + 0.19 * walk(8)
    return x - np.clip(share, 0, .6) * band


def dips():
    """Gain of the brief dips and lifts: each ramps towards its depth and back."""
    t = np.arange(N) / SR
    dip_db = 0
    for s, ramp, end, back, db in DIPS:
        dip_db = dip_db + db * np.clip(np.minimum((t - s) / ramp, (end - t) / back), 0, 1)
    return undb(dip_db)


def scene():
    """Rustle in five sizes, lesser and big snaps and thumps, in the room."""
    levels_db = handling()
    flurry_db, flutter = 1.5 * walk(35), walk(110)
    big = snaps(SNAPS)
    bag = snaps(ticks(levels_db)) + thumps()
    pan_db = at_all_times(PAN)
    for crease_size, db, flutter_db in zip(CREASE_SIZES, levels_db, FLUTTER_DB):
        size_flurry_db = np.minimum(flurry_db + flutter_db * flutter, 4.5)
        bag = bag + rustle(crease_size, db, pan_db, size_flurry_db)
    dip = dips()
    packet = big + (bag + room(bag + big)) * dip
    return hollow(shape(packet, COLOUR)) + air() * dip


def record(dry):
    """The loudest peaks are rounded and the top is cut."""
    top_cut = signal.ellip(10, .2, 85, TOP_HZ, fs=SR, output="sos")
    return signal.sosfilt(top_cut, np.tanh(dry))


dry = scene()
out = record(dry)
generate_wav(out)
```